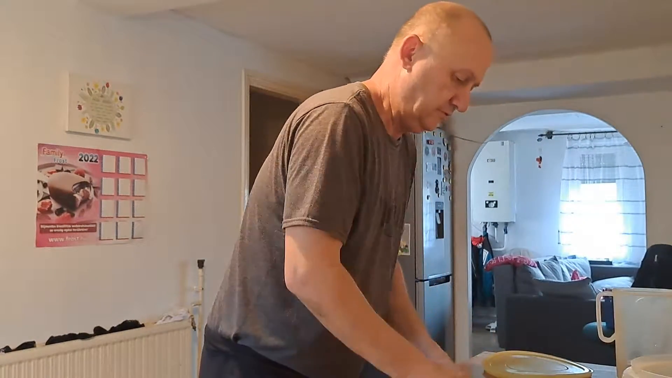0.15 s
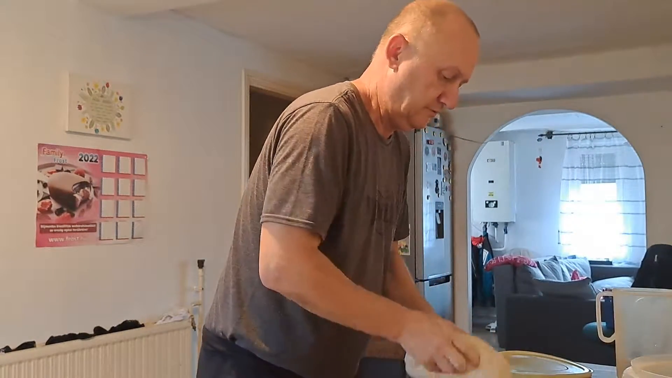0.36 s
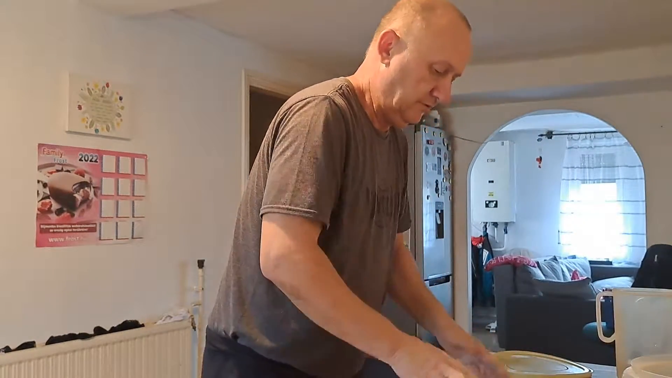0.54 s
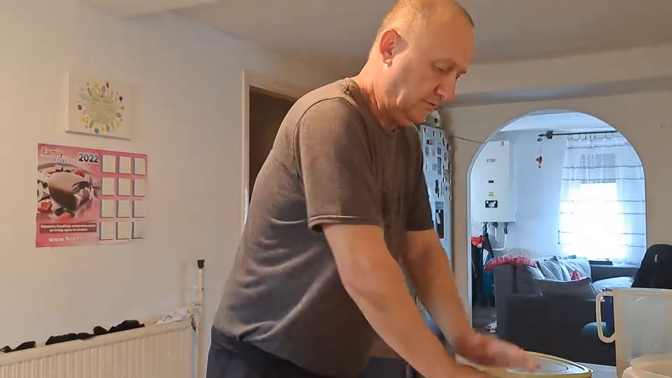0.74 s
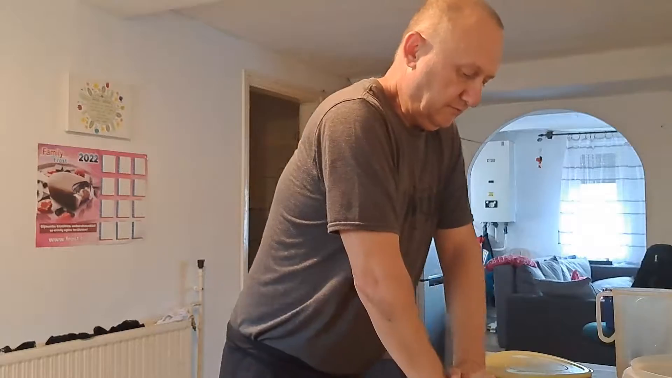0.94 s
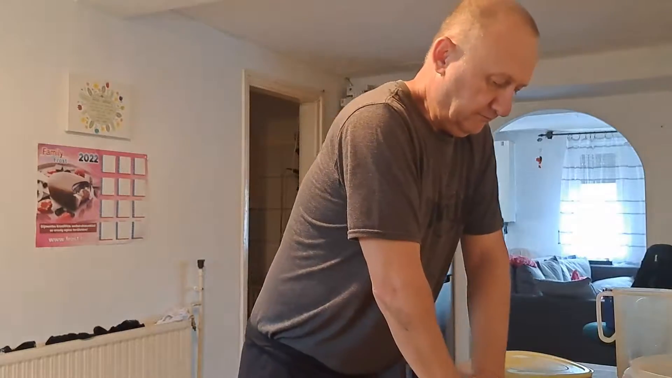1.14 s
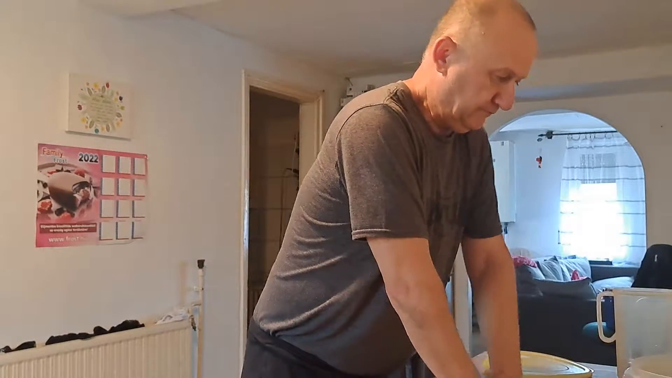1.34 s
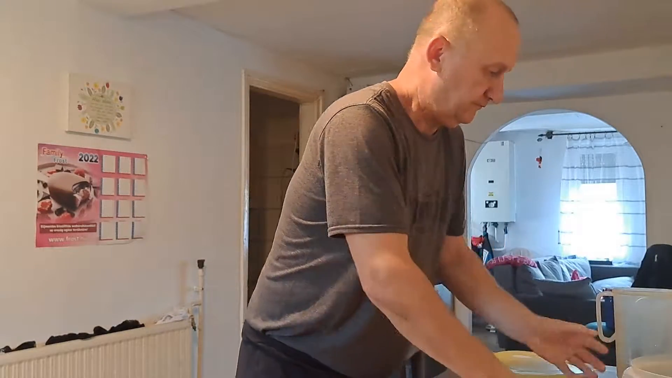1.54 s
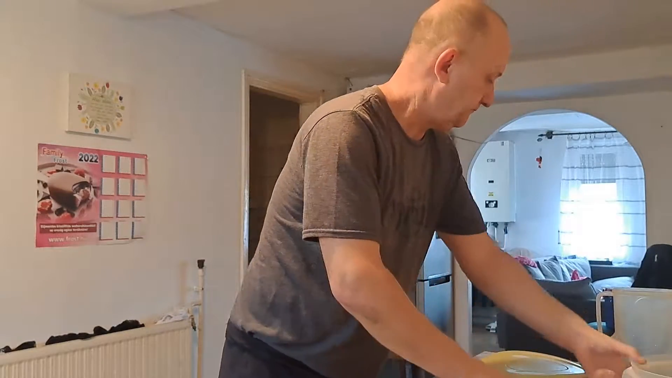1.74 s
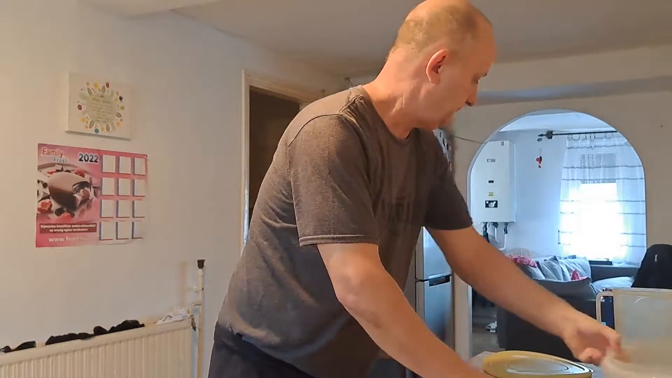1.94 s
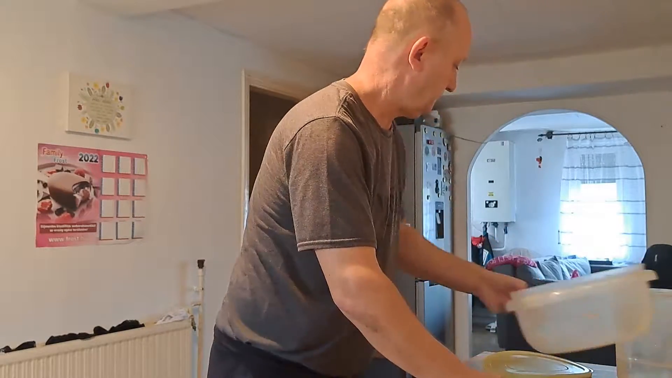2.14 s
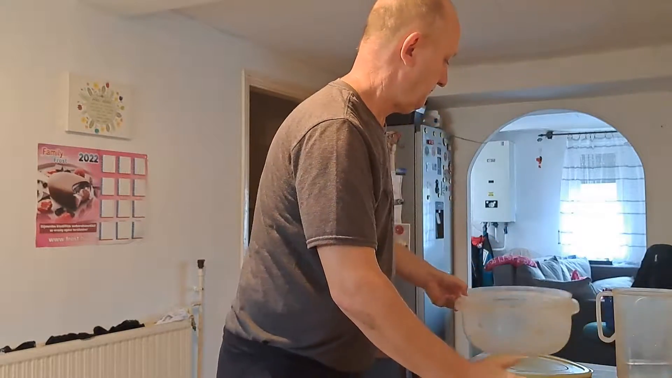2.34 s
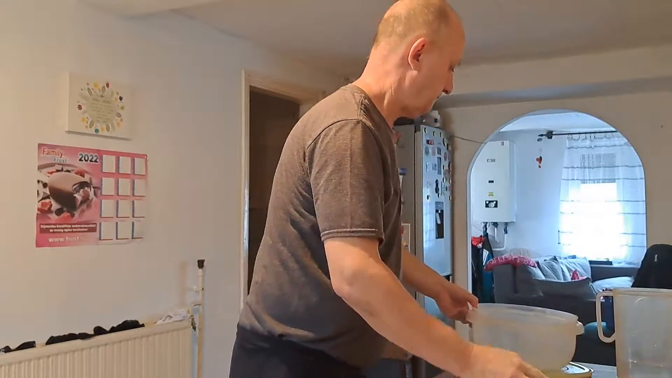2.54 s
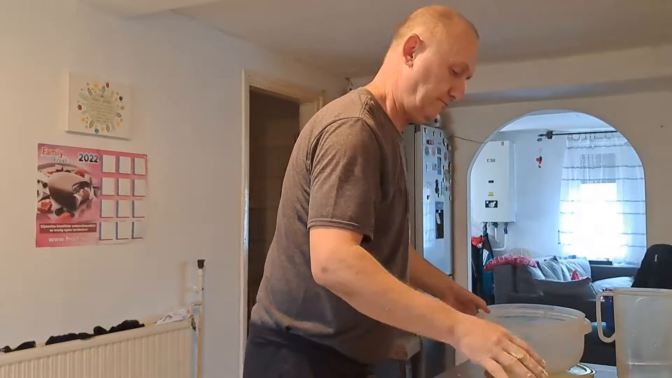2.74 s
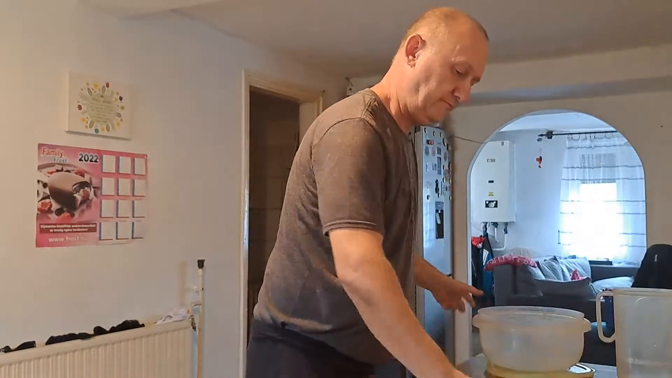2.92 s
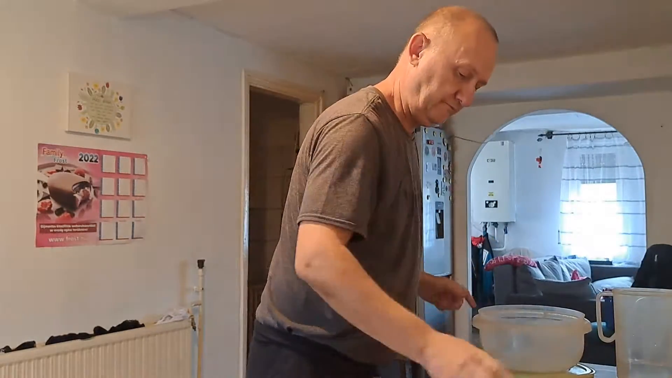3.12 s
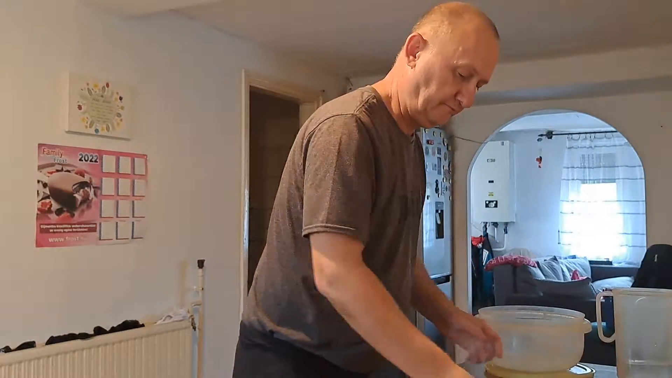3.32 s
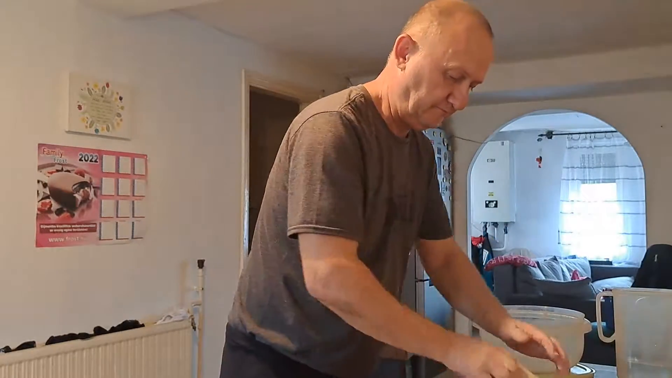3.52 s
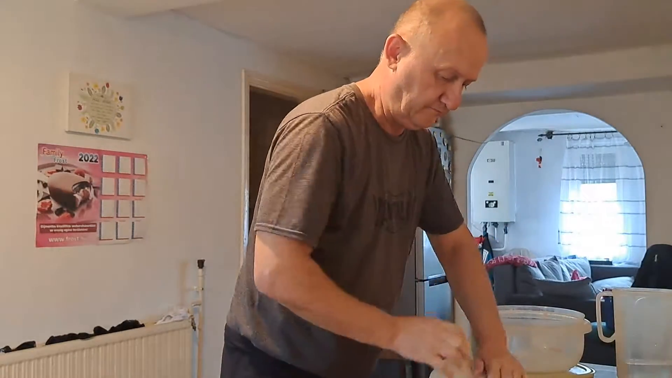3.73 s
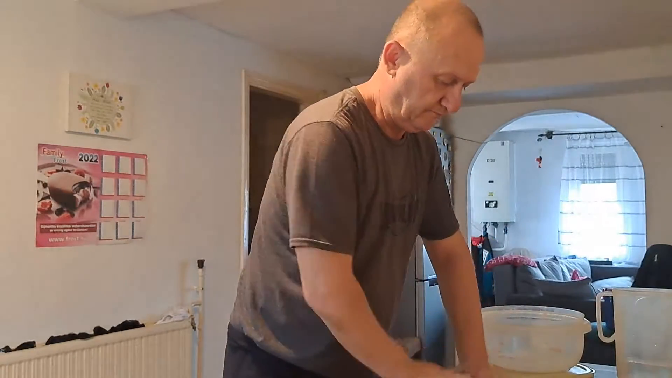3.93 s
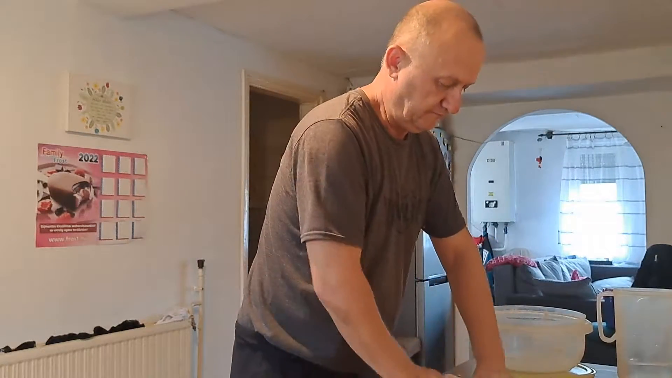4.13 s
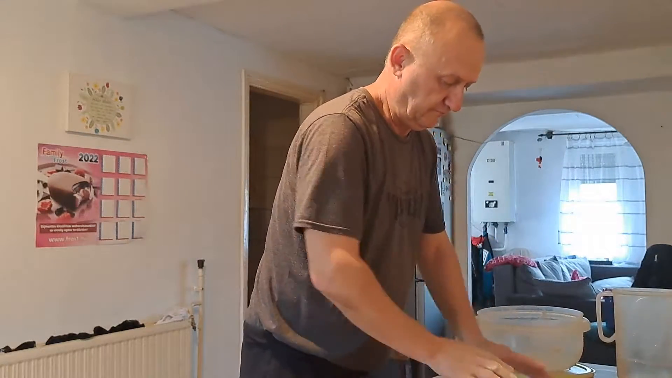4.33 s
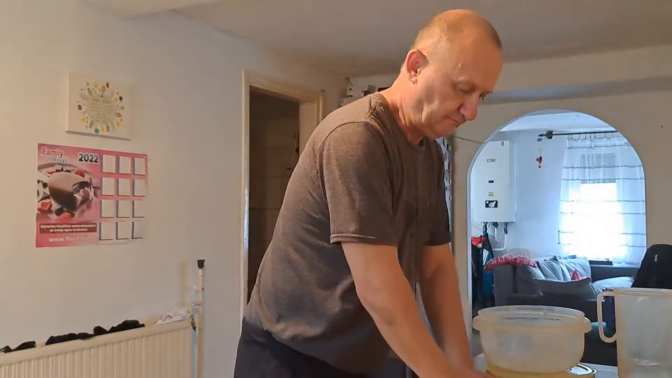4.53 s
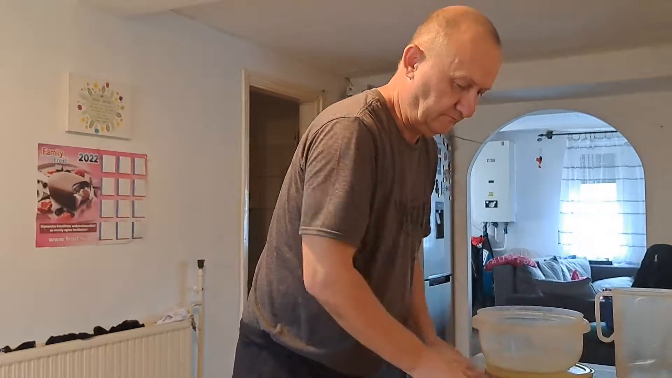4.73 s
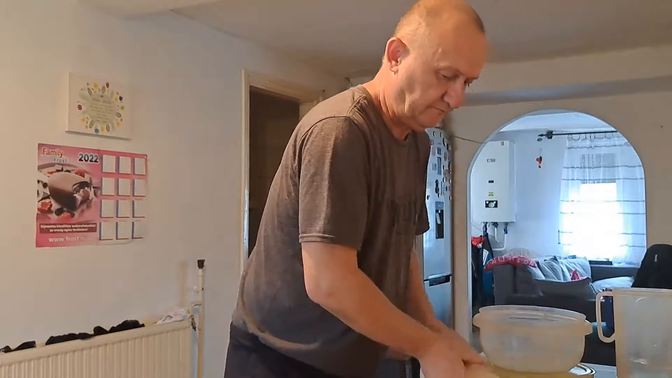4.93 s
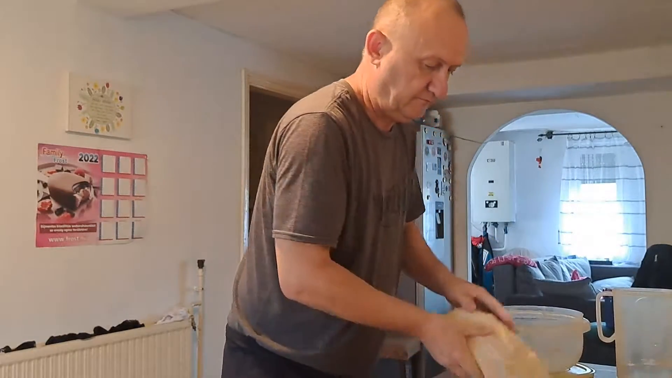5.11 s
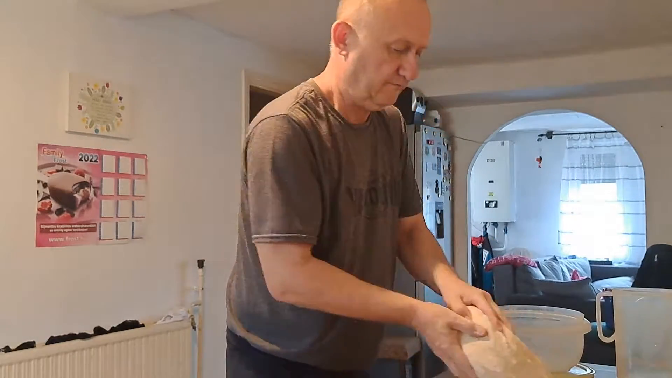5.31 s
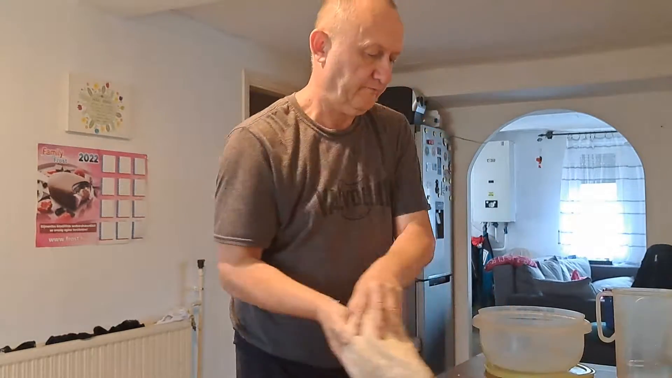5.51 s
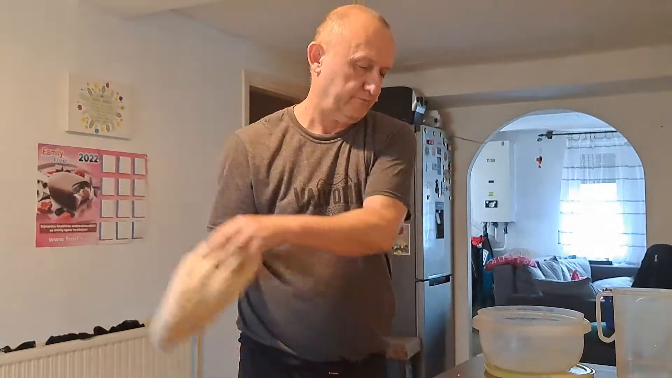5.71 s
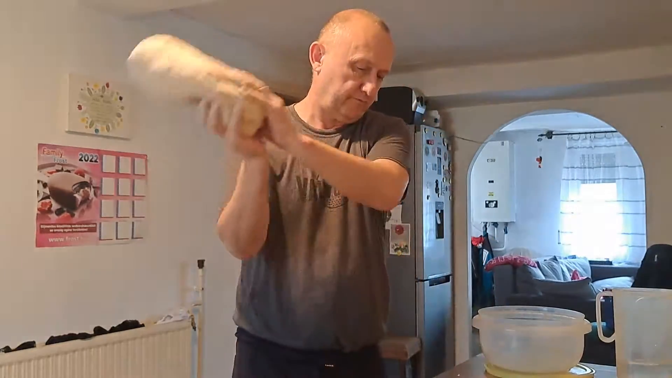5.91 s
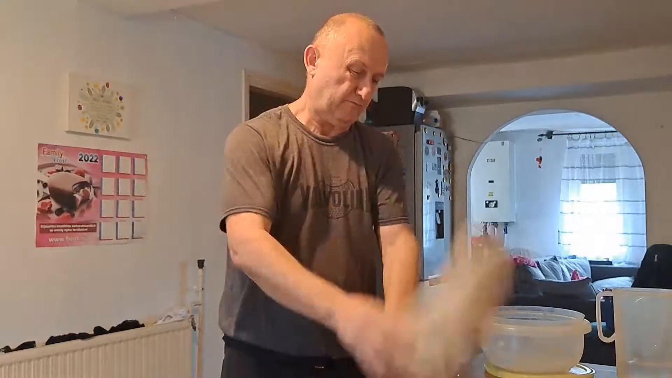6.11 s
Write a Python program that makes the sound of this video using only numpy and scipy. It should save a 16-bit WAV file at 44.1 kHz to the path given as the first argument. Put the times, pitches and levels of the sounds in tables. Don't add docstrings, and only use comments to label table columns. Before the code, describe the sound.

Soft kneading close to two spaced microphones: floury rustles, sticky rubs, finger presses and a few stronger thuds with deep counter resonance. After a sparse pause a bowl clunks down and small things rattle briefly. Kneading resumes with brisk pats and folds, then quiets as the dough peels away with a dry hiss and swings. A huge sharp smack ends it, ringing shortly in the small tiled kitchen.

```python
import sys
import numpy as np
from scipy import signal
from scipy.fft import rfft, irfft, next_fast_len
from scipy.io import wavfile
from scipy.ndimage import uniform_filter1d

SR = 44100
rng = np.random.default_rng(int(sys.argv[2]) if len(sys.argv) > 2 else 0)


def amp(db):
    return 10 ** (np.asarray(db, float) / 20)


def write(x):
    x = np.atleast_2d(x).T
    wavfile.write(sys.argv[1], SR, np.round(np.clip(x, -1, 1) * 32767).astype(np.int16))


N = 276066


def band(x, lo_hz, hi_hz, order=2):
    return signal.sosfilt(signal.butter(order, [lo_hz, min(hi_hz, .45 * SR)], "band", fs=SR, output="sos"), x)


def shaped(x, shape):
    hz, db = np.transpose(shape)
    n = next_fast_len(x.shape[-1] + 4096, real=True)
    f = np.maximum(np.fft.rfftfreq(n, 1 / SR), 1)
    gain = amp(np.interp(np.log(f), np.log(hz), db))
    return irfft(rfft(x, n) * gain, n)[..., :N]


def coloured(x, shape):
    y = shaped(x, shape)
    return y / np.sqrt(np.mean(y ** 2))


def walk(rate_hz):
    hold = int(SR / rate_hz)
    steps = np.repeat(rng.standard_normal(N // hold + 1), hold)
    return 1.378 * uniform_filter1d(uniform_filter1d(steps, hold), hold)[:N]


def ports(x):
    late_s, left_db = .0001, -1
    n = np.arange(N)
    left = np.interp(n - late_s * SR, n, x)
    return np.array([amp(left_db / 2) * left, amp(-left_db / 2) * x])


def spread(alike):
    alike = np.clip(alike, 0, 1)
    from_counter = ports(rng.standard_normal(N))
    all_round = rng.standard_normal((2, N))
    return np.sqrt(alike) * from_counter + np.sqrt(1 - alike) * all_round


# f/Hz, density/dB per Hz
HUSH_COLOUR = [(18, -50), (30, -16.5), (64, -0.5), (273, -15), (364, -8), (600, -16), (822, -9),
               (1100, -19.5), (3580, -28.5), (7270, -15.5), (9220, -29.5), (12600, -23), (16000, -28.5)]


def hush(near):
    level_db, gate_db, gate_depth_db, gate_s = -71, -68.5, 6, 0.071
    power = np.maximum(uniform_filter1d(near[0] ** 2, int(gate_s * SR)), 0)
    shut = 1 / (1 + power / amp(2 * gate_db))
    return amp(level_db - gate_depth_db * shut + walk(3.313)) * coloured(spread(0.11), HUSH_COLOUR)


def ringing(pushes, rule):
    rise_s, free, smothered, rest_db = rule
    s = np.arange(0, N, 32) / SR
    power = amp(2 * rest_db)
    for start, db, length in pushes:
        t = np.maximum(s - start, 0)
        build_up = 1 - np.exp(-(t / rise_s) ** 2)
        decay_db = free * t + smothered * np.maximum(t - length, 0)
        power = power + (build_up * amp(db - decay_db)) ** 2
    return np.interp(np.arange(N) / SR, s, np.sqrt(power))


# f/Hz, wander/Hz
BOOM_MODES = [(40, 8), (64.6, 1.766)]
# t/s, level/dB, time until the dough smothers it/s
SWAY_PUSHES = [(0.125, -72.0, 0.09), (0.23, -59, 0.29), (0.575, -51.5, 0.294), (0.665, -37, 0.02),
               (0.815, -71.5, 0.204), (1.035, -69, 0.3), (1.29, -68.5, 0.3), (1.5, -71.5, 0.3),
               (2.12, -74.5, 0.3), (2.605, -61.5, 0.3), (2.98, -51, 0.19), (3.385, -62.5, 0.09),
               (3.45, -52, 0.295), (3.66, -57.5, 0.37), (3.965, -48.0, 0.307), (4.335, -58.5, 0.3),
               (4.46, -58.5, 0.2), (4.57, -52.0, 0.3), (4.775, -54.5, 0.33), (4.935, -52.5, 0.3),
               (5.195, -55.5, 0.292), (5.565, -66.5, 0.32), (5.965, -72, 0.3)]
PANEL_PUSHES = [(0, -65, 0.15), (0.17, -51, 0.2), (0.21, -46.5, 0.29), (0.245, -42.0, 0.149),
                (0.592, -26, 0.2006), (0.79, -57.5, 0.134), (0.95, -69, 0.305), (1.2, -62, 0.3),
                (1.325, -53.5, 0.049), (1.435, -66.5, 0.3), (1.565, -67, 0.05), (1.79, -67.0, 0.3),
                (2.365, -74.0, 0.3), (2.64, -59, 0.15), (3.0, -41.5, 0.19), (3.365, -63, 0.21),
                (3.56, -62.5, 0.3), (3.66, -63, 0.2), (4.0, -44.0, 0.3), (4.35, -56.5, 0.3),
                (4.5, -27.5, 0.19), (4.73, -48.5, 0.06), (4.83, -59, 0.2), (4.915, -54.0, 0.2),
                (5.235, -61.5, 0.3), (5.63, -68.0, 0.3), (5.93, -67, 0.3)]
UPPER_PUSHES = [(0.01, -59.5, 0.3), (0.17, -42.5, 0.28), (0.24, -43.5, 0.158), (0.588, -33.5, 0.089),
                (0.73, -48.5, 0.3), (0.965, -65.5, 0.33), (1.155, -58.0, 0.2), (1.225, -54, 0.3),
                (1.325, -48.5, 0.3), (1.49, -55, 0.1), (1.565, -52, 0.1), (1.785, -60.5, 0.3),
                (2.125, -66.5, 0.3), (2.64, -53.5, 0.18), (3.003, -51, 0.3), (3.12, -51.5, 0.2),
                (3.305, -66.5, 0.3), (3.395, -52.0, 0.3), (3.59, -53.5, 0.3), (4.012, -42, 0.3),
                (4.13, -49, 0.3), (4.32, -49, 0.3), (4.495, -39, 0.3), (4.6, -44, 0.2),
                (4.72, -42.5, 0.052), (4.795, -45.5, 0.2), (4.93, -45.5, 0.2), (5.045, -52.5, 0.0485),
                (5.14, -62.5, 0.3), (5.61, -70, 0.1), (5.9, -75, 0.3)]
# build-up/s, free decay/dB per s, extra smothered decay/dB per s, resting level/dB
SWAY_RULE = (0.1, 58.5, 248.5, -89.5)
PANEL_RULE = (0.023, 89, 298.5, -89.5)
UPPER_RULE = (-0.0042, 148.5, 397.5, -84.5)


def boom():
    upper_hz, width_hz = 135.42, 35.46
    upper = band(rng.standard_normal(N), upper_hz - width_hz / 2, upper_hz + width_hz / 2)
    steady = upper / np.sqrt(uniform_filter1d(upper ** 2, size=3000))
    out = ringing(UPPER_PUSHES, UPPER_RULE) * steady
    gains = ringing(SWAY_PUSHES, SWAY_RULE), ringing(PANEL_PUSHES, PANEL_RULE)
    for (hz, wander_hz), gain in zip(BOOM_MODES, gains):
        phase = 2 * np.pi * np.cumsum(hz + wander_hz * walk(15)) / SR
        out = out + np.sqrt(2) * gain * np.sin(phase)
    return out


def stroke_gains(table):
    roundness = 1.63
    s = np.arange(0, N, 32) / SR
    power = 0
    for mid, half, rub, rustle in table:
        fall_db = 10 * np.abs((s - mid) / max(half, .01)) ** roundness
        power = power + amp(np.array([[rub], [rustle]]) - fall_db) ** 2
    return [np.interp(np.arange(N) / SR, s, np.sqrt(p)) for p in power]


def strokes(table, rub, rustle):
    rub_gain, rustle_gain = stroke_gains(table)
    slips = spread(0.5) * amp(2.94 * walk(50))
    grains = spread(0.068) * amp(0.56 * walk(100) + 3.11 * walk(20))
    return amp(-.6) * rub_gain * coloured(slips, rub) + rustle_gain * coloured(grains, rustle)


# middle t/s, half length/s, rub level/dB, flour rustle level/dB
HAND_STROKES = [(0.09, 0.093, -71, -65.5), (0.23, .08, -66.5, -67), (0.55, 0.074, -70.5, -67),
                (0.74, 0.118, -59, -64.5), (0.865, .07, -73.5, -66.5), (1.33, 0.049, -52, -63),
                (1.55, 0.176, -65.5, -75.5), (1.78, 0.164, -64, -70), (1.872, .035, -59.5, -61),
                (2.03, 0.217, -70, -82.5), (2.4, 0.166, -80.5, -79.5), (2.72, 0.1076, -65.5, -69.5),
                (3.23, 0.056, -73.5, -95), (3.47, 0.089, -90.5, -69.5), (3.66, .12, -72, -68.5),
                (3.78, 0.168, -81.5, -77), (4.19, .08, -63, -65), (4.37, 0.084, -62, -75),
                (4.57, 0.0785, -52, -59), (4.66, 0.0795, -54.5, -60), (4.85, 0.059, -64, -64.5),
                (4.94, 0.088, -64.5, -62), (5.1, 0.099, -69, -63.5), (5.27, 0.097, -78, -72.5)]
# f/Hz, density/dB per Hz
RUB_COLOUR = [(100, -42), (170, -9), (285, -15.5), (333, -3), (418, -13), (1010, -9.5), (1120, -35),
              (1290, -20), (3000, -39.5), (3900, -64), (6600, -120)]
RUSTLE_COLOUR = [(880, -6.5), (1500, -6.5), (1960, -5.5), (2860, -15.5), (4000, -5), (8920, -16),
                 (13100, -13.5), (16000, -21)]


def rubbing():
    return strokes(HAND_STROKES, RUB_COLOUR, RUSTLE_COLOUR)


# t/s, f/Hz,
# level/dB, t60/s
RINGS = [(.176, 657, -49.5, 0.063), (0.189, 385, -47.5, 0.098), (.592, 837, -30, 0.079),
         (1.345, 1940, -50, 0.127), (1.64, 650, -56.5, 0.52), (1.88, 860, -45.5, 0.198),
         (1.88, 1100, -52.5, 0.115), (2.634, 390, -32, 0.124), (2.63, 1200, -42.5, 0.23),
         (2.632, 1800, -45.5, .15), (3.005, 1920, -43, 0.35), (3.125, 1950, -48.5, 0.147),
         (2.632, 950, -36, 0.2), (2.637, 1200, -39, 0.2), (2.634, 520, -37, 0.17), (0.043, 402, -56, .2),
         (0.0772, 725, -57.5, .15), (1.19, 330, -54.5, 0.205), (1.8, 300, -58, 0.484),
         (4.74, 830, -44.5, 0.236), (4.75, 399, -45.5, 0.193), (5.26, 371, -62, 0.177),
         (1.3, 190, -52, 0.262), (5.24, 220, -68, 0.248), (3.02, 260, -56, 0.3), (0.92, 240, -74, 0.207),
         (4.09, 1200, -46, 0.144), (4.171, 1340, -52.5, 0.17), (4.855, 392, -47.5, 0.1),
         (.07, 1950, -66, .1), (.082, 350, -56, .08), (.218, 440, -50, .06), (.24, 1850, -60, .1),
               (.32, 330, -56, .12), (.965, 320, -66, .15), (1.065, 300, -64, .15), (1.07, 600, -70, .1),
               (1.32, 300, -52, .1), (1.343, 1350, -52, .08), (1.346, 2300, -54, .12),
               (1.864, 4400, -62, .1), (2.632, 2510, -48, .14), (3.004, 4750, -53, .18),
               (3.004, 600, -52, .1), (3.122, 450, -49, .08), (3.124, 3850, -53, .15),
               (3.124, 2450, -49, .15), (3.315, 350, -64, .12), (3.588, 1950, -64, .1), (3.6, 800, -56, .2),
               (3.6, 480, -56, .18), (2.13, 500, -62, .15), (4.008, 1750, -46, .15),
               (4.012, 1000, -54, .15), (4.028, 450, -48, .06), (4.086, 450, -46, .06),
               (4.092, 2400, -51, .1), (4.112, 400, -46, .07), (4.282, 480, -50, .06),
               (4.332, 460, -49, .07), (4.336, 1340, -52, .15), (4.337, 2450, -53, .1),
               (4.497, 2000, -46, .2), (4.52, 1400, -50, .15), (4.76, 1200, -56, .2),
               (4.84, 1900, -60, .15), (4.938, 350, -45, .08), (4.945, 750, -52, .15),
               (5.137, 1340, -60, .12), (5.14, 2150, -64, .15), (6.226, 1290, -25, .12),
               (6.227, 1740, -26, .12), (6.227, 1920, -27, .1), (6.226, 5460, -23, .045),
               (6.225, 12300, -24, .025), (6.2255, 13500, -22, .03), (6.226, 920, -31, .15)]


def rings():
    scatter_hz = 900
    out = np.zeros((2, N + SR // 2))
    t = np.arange(SR // 2) / SR
    table = RINGS
    for (s, hz, db, t60), turn in zip(table, rng.standard_normal((len(table), 1))):
        i = int(s * SR)
        phase = np.array([turn, -turn]) * min(hz / scatter_hz, 1)
        swell = 1 - np.exp(-t / min(.004, 6 / hz))
        out[:, i:i + len(t)] += amp(db - 60 * t / t60) * swell * np.sin(2 * np.pi * hz * t + phase)
    return out[:, :N] * amp(5 * walk(90) + 2.5 * np.array([walk(60), walk(60)]))


# f/Hz, width/Hz, level/dB
WORKTOP = [(363.2, 85.5, -2.5), (824.2, 96, -11), (1339.2, 77.5, -4), (1948, 154, -6.5)]


def worktop(x):
    return x + sum(amp(db) * band(x, hz - w / 2, hz + w / 2) for hz, w, db in WORKTOP)


def timed(table, ms):
    return [(*row, ms) for row in table]


# t60/s, level/dB, share alike at both ports
KITCHEN = [(0.4237, -1.5, 0.921), (0.3966, -2, 0.2), (0.3774, 0, 0.117), (0.471, -2, 0.088)]
DIRECT_ALIKE = [.8, .3, .2, .1]


def contacts(table, bands, rise):
    tail_end_s, first_echo_s = 0.1934, 0.00271
    t = np.arange(8192) / SR
    power = np.zeros((4, N + len(t)))
    for s, body, thud, snap, crisp, ms in table:
        contact = np.clip(ms, .5, 40) / 1000
        shape = (1 - np.exp(-t / (rise * contact))) * np.exp(-t / contact)
        levels = body + np.array([[thud], [0], [snap], [crisp]])
        i = int(s * SR)
        power[:, i:i + len(t)] += (amp(levels) * shape) ** 2
    t = np.arange(SR // 2) / SR
    out = 0
    for p, (lo, hi), (t60, db, alike), first in zip(power[:, :N], bands, KITCHEN, DIRECT_ALIKE):
        fade = amp(db - 60 * t / t60) * np.exp(-(t / tail_end_s) ** 4)
        fade = fade * (1 - np.exp(-(t / first_echo_s) ** 2))
        tail = np.sqrt(np.maximum(signal.fftconvolve(p, fade ** 2)[:N], 0) * 100 / SR)
        tail = tail * amp(1.943 * walk(70))
        burst = np.sqrt(p) * spread(first) + tail * spread(alike)
        out = out + band(burst, lo, hi, order=3) * np.sqrt(SR / 2 / (hi - lo))
    return worktop(out)


# t/s, body level/dB, then thud, snap and crisp level/dB re body
PRESSES = [(0.044, -48, -4.5, -12.5, -5), (0.312, -56.5, 1.5, -21.5, -9), (0.8, -62, -5, 0, 0),
           (0.957, -71, 2, -2, -8), (1.06, -76.5, 13, -17.5, -19.5), (1.178, -67.5, 15, -27.5, -4),
           (1.451, -60, 2, -3, -11.5), (1.626, -49.5, -4, -7.5, -17), (1.689, -52.5, -22.5, -6, -29.5),
           (1.768, -49, -6.5, -6, -31.5), (3.31, -72, 9, -5, -2.5), (3.451, -55.5, -6, -14, -1.5),
           (4.161, -57, -9.5, 3.5, -17), (4.283, -53, -3.5, -6, -9), (4.585, -45.5, 2.5, -3.5, -14.5),
           (4.799, -51.5, -17.5, -24.5, -8.5), (4.845, -54, 3.5, -3.5, -0.5), (5.134, -57, -8, 2.5, 3)]
LEANS = [(0.218, -49.5, -12.5, -4.5, -7.5), (0.732, -47.5, -8, -9, -25), (0.789, -52.5, -32, -0.5, -31),
         (1.229, -67, 4, -24, 2), (1.549, -64, -1.5, -16, -15.5), (2.122, -56.5, -8, -15.5, -30.5),
         (2.376, -69.5, -8, -11, 4.5), (3.395, -66.5, 6.5, -14.5, 4.5), (3.584, -49.5, -8, -12.5, -7.5),
         (4.731, -41, -5, -14, -18), (4.769, -48.5, -8, -9.5, -13.5), (5.619, -70.5, -4.5, 2.5, -1.5)]
# low f/Hz, high f/Hz
PRESS_BANDS = [(190, 450), (450, 1100), (1100, 2600), (2600, 16500)]


def presses_and_leans():
    table = timed(PRESSES, 10.4) + timed(LEANS, 16.6)
    return amp(4.5) * contacts(table, PRESS_BANDS, rise=0.712)


# t/s, body level/dB, then thud, snap and crisp level/dB re body
PATS = [(0.173, -59, 14.5, -28.5, -16.5), (0.586, -35.5, -7, -10, -10.5), (1.284, -50, -2, -15, -13),
        (1.341, -39.5, -12, -6.5, -7), (1.879, -46.5, -7.5, -11, -32), (2.628, -29.5, -9.5, -17.5, -20),
        (3.002, -41.5, -4, -3.5, -7.5), (3.123, -39, -14, -4.5, -7), (4.006, -39.5, -10.5, -11, -13),
        (4.09, -43, -5, -12.5, -37), (4.334, -46.5, -6, -12.5, -18.5), (4.494, -33, -3, -10.5, -12),
        (4.937, -48, 5, -13, -14), (6.227, -12.5, -5, -4, -1.5)]
SLAP_FRONT = (6.2241, -11, -10, -5, -1)
# low f/Hz, high f/Hz
PAT_BANDS = [(300, 750), (750, 2700), (2700, 6000), (6000, 16500)]


def pats():
    table = timed(PATS, 4.693) + timed([SLAP_FRONT], 2)
    return amp(6.5) * contacts(table, PAT_BANDS, rise=0.362)


# middle t/s, half length/s, swing level/dB, peel level/dB
LIFTS = [
    (5.42, 0.084, -78, -94.5),
    (5.55, 0.06, -77.5, -54.5),
    (5.645, .07, -76.5, -58),
    (5.73, 0.084, -70.5, -70),
    (5.84, 0.07, -69.5, -79.5),
    (5.93, 0.0954, -65, -65),
    (6.03, 0.0706, -64, -67),
    (6.13, 0.074, -64.5, -90.5),
    (6.215, 0.042, -55, -55.5),
]
# f/Hz, density/dB per Hz
SWING_COLOUR = [(88, -39.5), (150, -19.5), (231, 4), (312, -19.5), (354, -9), (624, -27.5), (742, -23),
                (945, -9), (1500, -24.5), (1950, -57.5), (3300, -120)]
PEEL_COLOUR = [(760, -21), (1300, -11.5), (1980, -5), (2710, -8.5), (3840, -3.5), (6980, -5), (9070, -10.5),
               (13500, -10.5), (16000, -26)]


def peeling():
    return strokes(LIFTS, SWING_COLOUR, PEEL_COLOUR)


# t/s, level/dB, sign of pressure
CRACKS = [
    (6.2242, -9, -1),
    (6.2277, -9, 1),
    (6.2318, -10, -1),
    (6.2399, -12, -1),
]
# f/Hz, level/dB, t60/s, build-up/ms
SLAP_MODES = [(67.3, -14.5, 0.74, 15), (135.4, -13.5, 0.41, 5), (362.6, -6.5, .25, 6),
              (192.4, -19.5, 0.25, 7.2), (632.3, -24, 0.157, 4)]


def slap_boom():
    slap_s, crack_ms = 6.226, .14
    s = np.arange(N) / SR
    out = sum(sign * amp(db) * np.exp(-((s - at) * 1000 / crack_ms) ** 2) for at, db, sign in CRACKS)
    t = np.maximum(s - slap_s, 0)
    for hz, db, t60, ms in SLAP_MODES:
        build_up = 1 - np.exp(-t * 1000 / ms)
        out = out + amp(db - 60 * t / t60) * build_up * np.sin(2 * np.pi * hz * t)
    return out


# f/Hz, level/dB
LEFT_COLOUR = [(65, -.4), (140, 2), (300, -1), (700, -3), (1500, -1.5), (3000, -1.8), (6000, -3.5),
               (10000, 1)]


def lopsided(x):
    return np.array([shaped(c, [(hz, sign * db / 2) for hz, db in LEFT_COLOUR]) for c, sign in zip(x, (1, -1))])


# f/Hz, level/dB
MIC = [(100, 4.5), (1000, -2), (1150, -6.5), (1400, -2), (2500, -3), (3100, -5), (4200, -1), (7200, -0.5),
       (9500, -7), (12600, -3), (17000, -11)]


def scene():
    knocks = shaped(rings() + presses_and_leans() + pats(), MIC)
    near = knocks + rubbing() + peeling()
    low = boom() + slap_boom()
    low_ports = np.array([np.pad(low, (4, 0))[:N], low])
    return lopsided(near + low_ports + hush(near))


def roll_off(x):
    return signal.sosfilt(signal.butter(12, 16530, fs=SR, output="sos"), x)


def record(dry):
    rounded = np.tanh(1.1 * dry) / 1.1
    mix = signal.sosfilt(signal.ellip(8, .2, 60, 16000, fs=SR, output="sos"), rounded)
    return roll_off(mix)


dry = scene()
out = record(dry)
write(out)
```